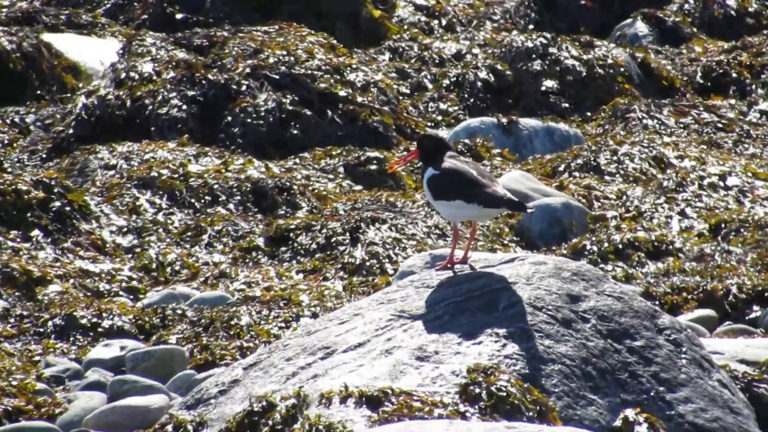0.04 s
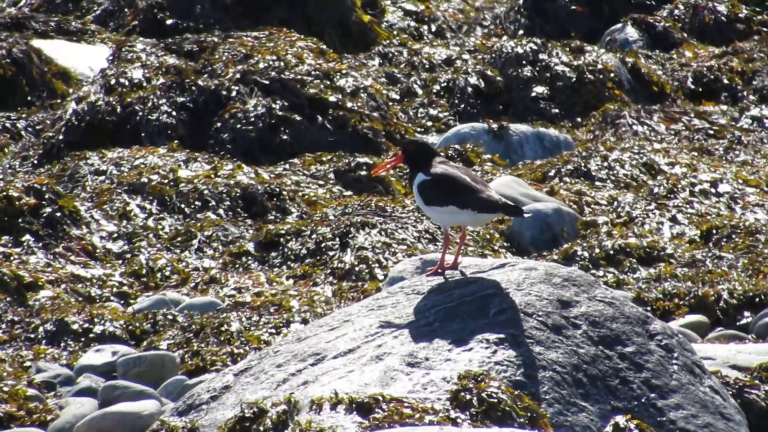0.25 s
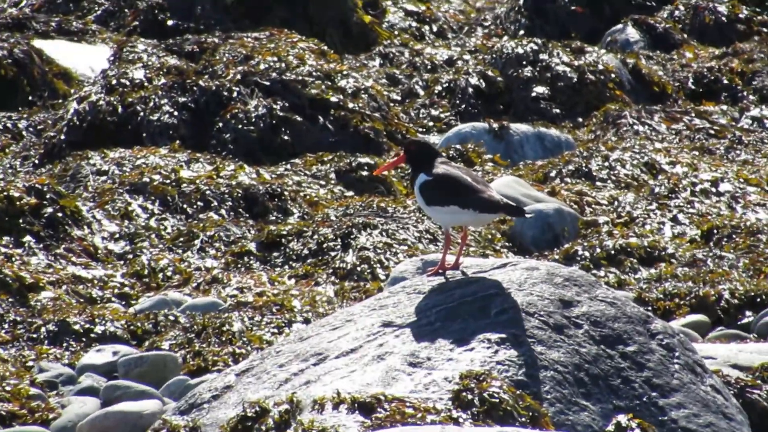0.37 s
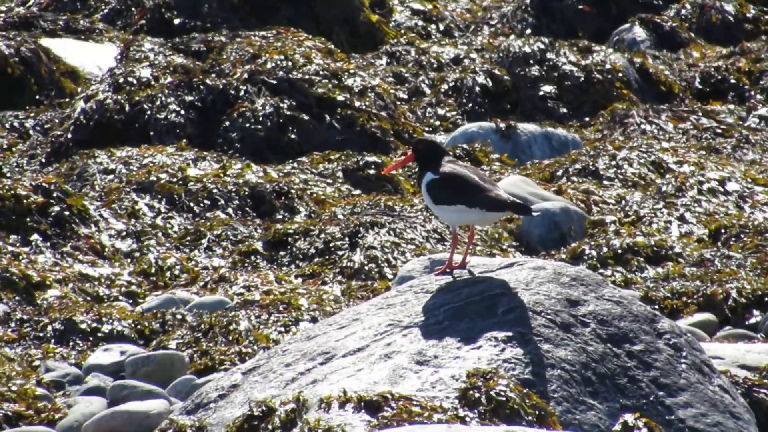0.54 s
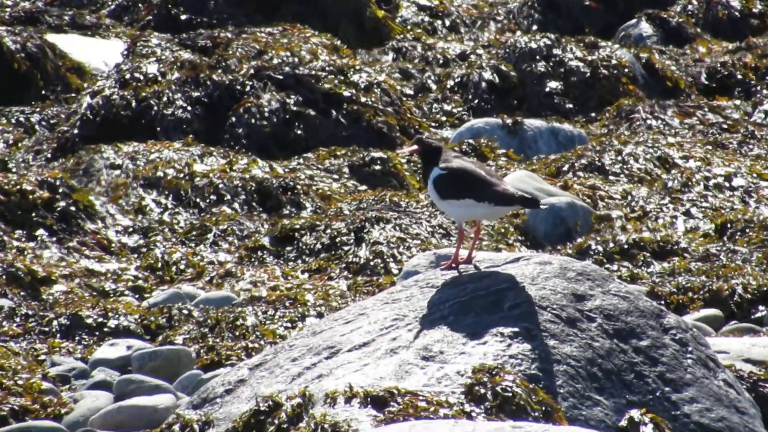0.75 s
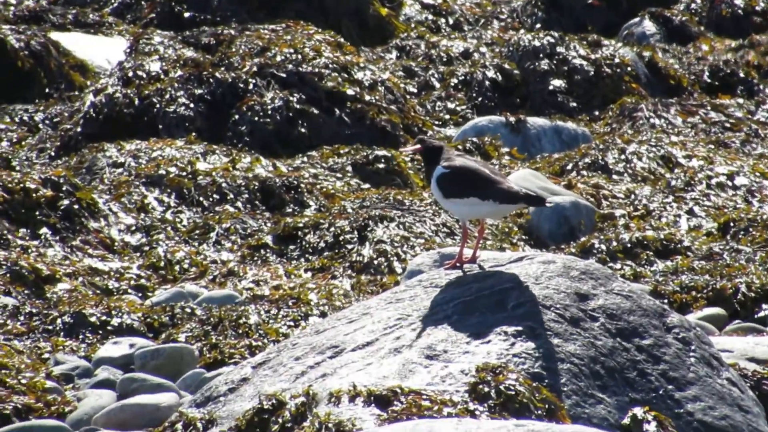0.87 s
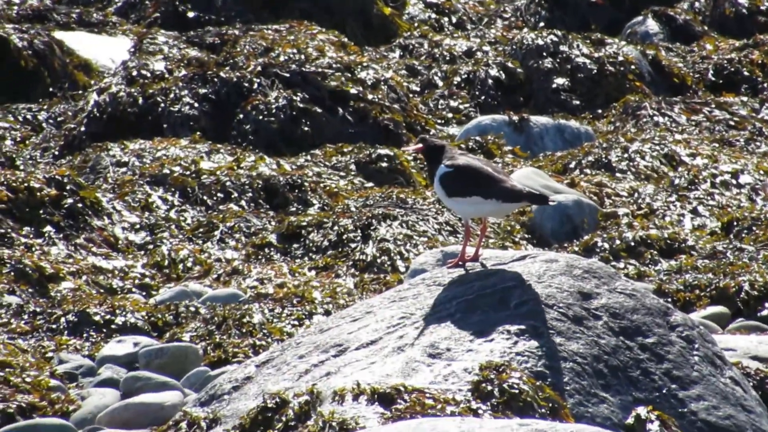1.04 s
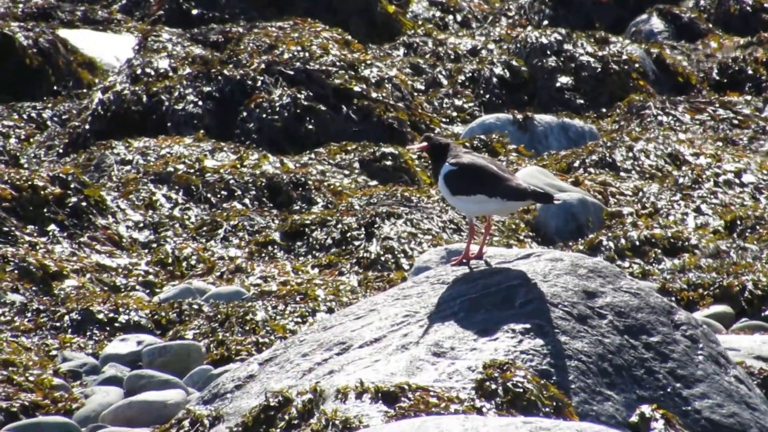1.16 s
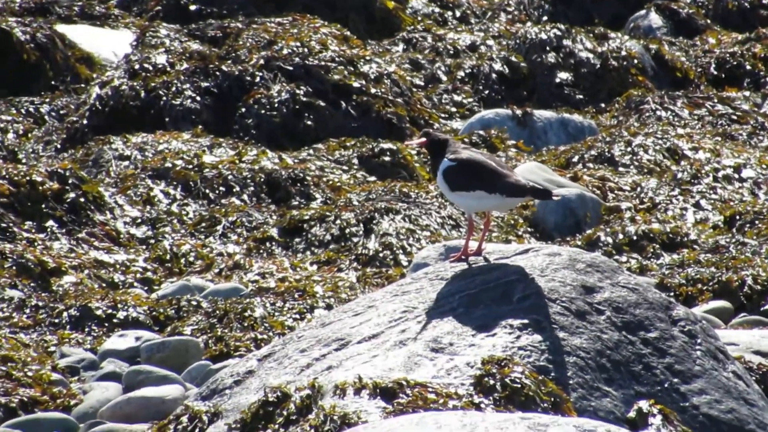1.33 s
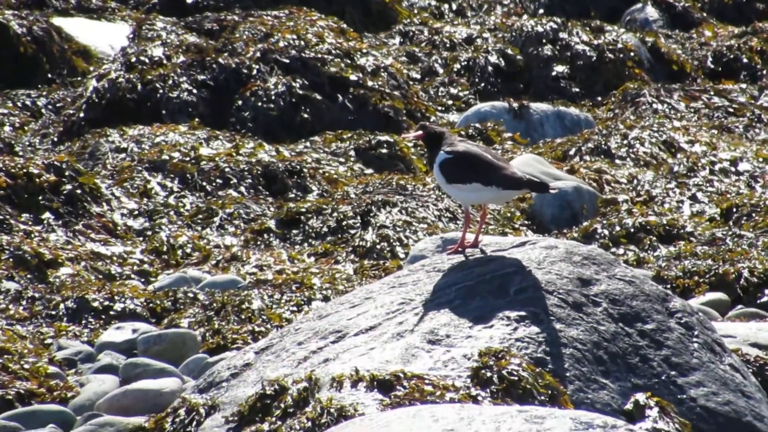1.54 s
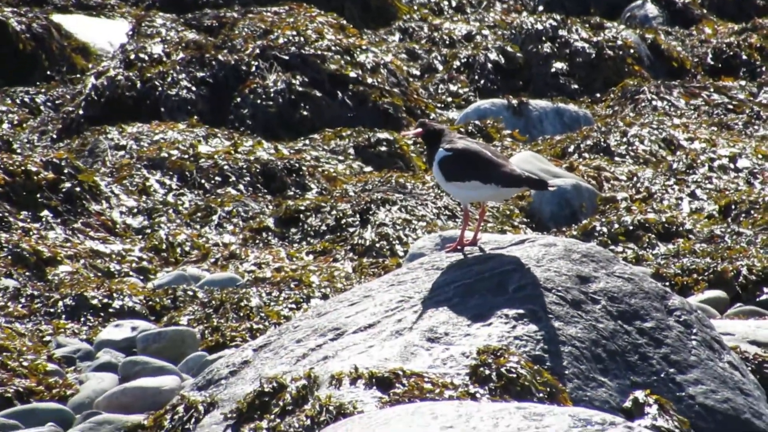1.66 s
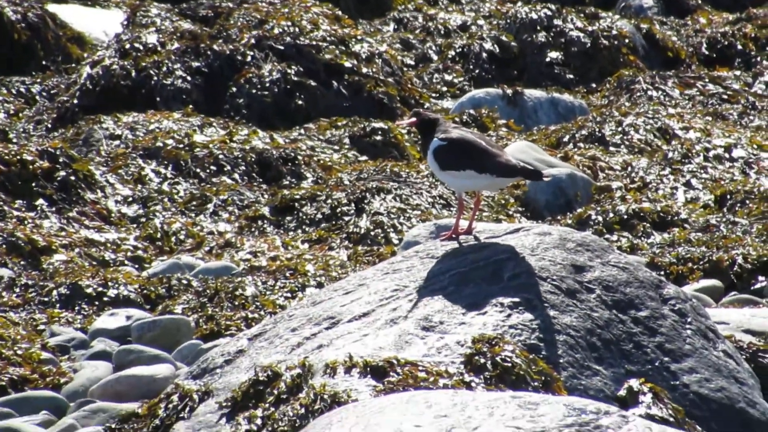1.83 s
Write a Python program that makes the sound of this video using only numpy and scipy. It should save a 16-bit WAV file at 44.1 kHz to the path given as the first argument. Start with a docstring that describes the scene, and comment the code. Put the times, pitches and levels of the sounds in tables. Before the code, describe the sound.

One short, piercing shorebird call cuts through buffeting wind and gently washing water.

```python
"""Wind buffets the microphone, whose housing rings and hums faintly, while small waves wash, fizz
and tick on a rocky shore. An oystercatcher cuts through with one sharp, arching "kleep", a whistle
that brightens with effort, and the stones scatter it back briefly.
Three small plops follow in the water, then one clear plop nearby."""
import sys
import numpy as np
from scipy import signal
from scipy.fft import rfft, irfft
from scipy.io import wavfile
from scipy.ndimage import uniform_filter1d

SR = 44100
rng = np.random.default_rng(int(sys.argv[2]) if len(sys.argv) > 2 else 0)


def dump_mix(stems):
    """Bounce the given channels to the path in sys.argv[1] as a 16-bit WAV at rate SR."""
    frames = np.atleast_2d(stems).T  # one column per channel
    limited = np.clip(frames, -1, 1)  # hard clip at full scale
    pcm = np.round(limited * 32767).astype(np.int16)
    wavfile.write(sys.argv[1], SR, pcm)


N = 83790
T, HZ = np.arange(N) / SR, np.fft.rfftfreq(N, 1 / SR)


def amp(db):
    """Decibels to gain."""
    return 10 ** (np.asarray(db) / 20)


def unit(x):
    """Scales to rms 1."""
    return x / np.sqrt(np.mean(x ** 2) + 1e-20)


def curve(points, col=1):
    """One column of a time table at every sample."""
    rows = np.transpose(points)
    return np.interp(T, rows[0], rows[col])


def eq(points, hz):
    """Reads a spectrum table on a log-frequency axis."""
    f, value = np.transpose(points)
    return np.interp(np.log(hz + 1), np.log(f + 1), value)


def noise(gain):
    """White noise of unit power per Hz, shaped by a gain for each frequency."""
    return irfft(rfft(rng.standard_normal(N)) * gain, N) * np.sqrt(SR / 2)


def low_noise(hz):
    """Noise low-passed at hz, rms 1."""
    return unit(noise(1 / (1 + (HZ / hz) ** 4)))


def ring(hz, width):
    """Noise in one resonance, 6 dB down at hz +/- width."""
    return unit(noise(1 / (1 + ((HZ - hz) / width) ** 2)))


# Rumble spectrum before the gusts (frequency [Hz], density [dB per Hz])
RUMBLE = [(10, -54), (32, -56.5), (58, -51.5), (100, -56.5), (150, -69.5), (200, -71), (270, -75),
          (500, -96), (2000, -125)]
# Gust envelope (time [s], gain [dB])
GUSTS = [(0, 1), (.05, 0.5), (.12, -2.5), (.2, 5.5), (.27, 0.5), (.41, 1), (.5, 4), (.58, -5), (.66, 3),
         (.78, -5), (.87, -5.5), (1.03, -5.5), (1.3, -3.5), (1.58, -3), (1.75, -12.5), (1.9, -3)]
# Single low thumps (time [s], level [dB], pitch [Hz])
BUFFETS = [(0.21, -26, 142), (0.328, -30.5, 86), (0.485, -27.5, 203), (0.497, -24.5, 191),
           (0.801, -27.5, 70), (1.001, -25, 48.7), (1.025, -25.5, 140), (1.444, -25.5, 135)]

def wind():
    """Wind rumbles and thumps on the microphone, pushing the two sides nearly out of phase."""
    strength = amp(curve(GUSTS) - 0.3 * low_noise(4))
    rumble_db = eq(RUMBLE, HZ)
    side, mid = noise(amp(rumble_db)), noise(amp(rumble_db - 15.5))
    out = (np.array([side, -side]) + mid) * strength
    side_turns = np.array([[0], [0.432]])
    for at, db, hz in BUFFETS:
        turns = (T - at) * hz
        envelope = amp(db) * np.exp(-(turns / 0.4) ** 2)
        out += envelope * np.cos(2 * np.pi * (turns + rng.random() + side_turns))
    return out


# Centre of the wash before the swell (frequency [Hz], density [dB per Hz])
WASH_MID = [(30, -74.5), (300, -84.5), (580, -84), (1000, -77.5), (1350, -85.5), (1650, -83), (3300, -90),
            (5000, -90), (6600, -96.5), (8300, -94.5), (10000, -102), (12800, -106), (14000, -113),
            (15000, -126)]
# Its stereo width (frequency [Hz], density [dB per Hz])
WASH_SIDE = [(30, -77), (400, -78.5), (800, -79.5), (1600, -85.5), (2800, -88.5), (4000, -95.5),
             (6500, -96.5), (10000, -100.5), (12800, -105), (14000, -111), (15000, -124)]
# Rise and fall of the waves, for wash and fizz (time [s], gain [dB])
SWELL = [(0, -2.5), (.4, -1.46), (.68, -0.5), (.8, 0), (1.08, 1), (1.22, 0), (1.5, -0.5), (1.7, -1.1),
         (1.9, -1.15)]
# How deeply each band rides the swell (frequency [Hz], depth [dB per dB])
SWELL_DEPTH = [(100, 0.095), (700, 0.83), (2000, 2.03), (6000, 1.1), (14000, 0.54)]

def waves():
    """Small waves make a patchy wash that swells most in the midrange."""
    mid, side = noise(amp(eq(WASH_MID, HZ))), noise(amp(eq(WASH_SIDE, HZ)))
    hz, t, spectrum = signal.stft([mid + side, mid - side], SR, nperseg=512)
    grain = uniform_filter1d(rng.standard_normal(spectrum.shape[1:]), size=9, axis=0)
    patch_db = 1.5 * unit(uniform_filter1d(grain, size=6, axis=1))
    swell_db = eq(SWELL_DEPTH, hz)[:, None] * np.interp(t, *np.transpose(SWELL))
    return signal.istft(spectrum * amp(swell_db + patch_db), SR)[1][:, :N]


def fizz(per_second=340, level_db=-56.5, spread_db=5):
    """Tiny splashes among weed and stones, louder as a wave comes in."""
    out, t = np.zeros((2, N)), T[:600]
    pitches = np.geomspace(1100, 6500, 24)
    for hz in pitches:
        hits = rng.random(N) < per_second / len(pitches) / SR
        gains = amp(spread_db * np.minimum(rng.exponential(1, N), 4))
        age = t * hz / 2.3  # higher splashes die sooner
        ping = age * np.exp(-2 * age) * np.sin(2 * np.pi * hz * t) / np.sqrt(hz)
        left = rng.uniform(0.16, 1.0)
        out += np.array([[left], [1 - left]]) * signal.oaconvolve(hits * gains, ping)[:N]
    return amp(level_db + curve(SWELL)) * unit(out)


# Hollow resonances of the housing (centre [Hz], half width [Hz], level [dB])
HOUSING_MODES = [(746, 49, -53), (822, 25, -57), (925, 79, -62.5)]

def housing(hum_hz=750.2, hum_db=-58, waver_rate_hz=7.06):
    """The microphone's housing rings steadily, with a thin, wavering hum at its lowest resonance."""
    hollow = sum(amp(db) * ring(hz, width) for hz, width, db in HOUSING_MODES)
    pitch = hum_hz + 5.8 * low_noise(waver_rate_hz)
    waver_db = 4 * low_noise(waver_rate_hz)
    hum = unit(amp(waver_db) * np.sin(2 * np.pi * np.cumsum(pitch) / SR))
    return hollow + amp(hum_db) * hum


# Ticks at the water's edge, plus the low body of the near plop at 1.398 s (time [s], half length [s], centre
# [Hz], half width [Hz], level [dB])
LAPS = [(0.032, 0.0021, 5400, 900, -47), (0.172, 0.0025, 5000, 500, -48.5), (0.461, 0.0048, 2150, 300, -48),
        (0.624, 0.0036, 790, 160, -41.5), (0.649, 0.003, 5040, 900, -48.5), (.651, 0.0036, 2280, 400, -49),
        (0.691, 0.0056, 1040, 250, -42.5), (0.851, .007, 1000, 120, -44), (1.043, 0.011, 945, 60, -43),
        (1.08, 0.024, 1630, 200, -50.5), (1.112, 0.022, 755, 102, -43.5), (1.219, 0.0018, 2700, 400, -46.5),
        (1.398, 0.0075, 342, 110, -47.5), (1.719, 0.0064, 2090, 200, -48)]

def laps():
    """Water laps and weed crackles in brief puffs of narrow noise, left of centre; one low puff gives the near
    plop its body."""
    out = np.zeros(N)
    for at, half_length, hz, width, db in LAPS:
        out += amp(db) * ring(hz, width) * np.exp(-((T - at) / half_length) ** 2)
    return out * amp([[1.5], [-1.5]])


# Arch of the "kleep" (time [s], pitch [Hz], effort [dB])
KLEEP = [(.2288, 2715, -7.5), (.241, 2737, -10.5), (.249, 2826, -10.5), (.257, 3046, 0.5), (.269, 3202, 1),
         (.276, 3248, 1.8), (.284, 3050, -1), (.293, 2847, -8), (.297, 2670, -13), (.302, 2584, -6),
         (.306, 2197, -10), (.3115, 1930, -6)]
# Harmonics, lowest first (base level [dB], growth with effort [dB per dB], left minus right [dB],
# attack [s], release [s], lag behind the effort [s])
HARMONICS = [(-22.5, 1.46, 4.5, 0.00032, 0.0012, 0.00019), (-30.5, 0.53, 0.8, 0.0037, 0.0081, 0.0037),
             (-26, 2.4, 4, 0.012, 0.013, 0.0013), (-39, 2.7, 7, 0.0024, 0.033, 0.0017)]
# Tone colour of the throat (frequency [Hz], gain [dB])
THROAT_EQ = [(900, -0.5), (2000, -9.5), (2700, 4), (4500, -4.5), (5400, 2), (5650, 6), (6400, -1),
             (8100, 2), (8400, 6), (8900, 2.5), (9700, -5.5), (10900, 4), (11400, -5), (12400, -4),
             (13000, -4.5)]

def oystercatcher(scoop_depth=0.72, scoop_s=0.0017, flutter_hz=398, rasp_db=-39.5, rasp_s=0.014):
    """A whistle leaps up with a rasp, arches and falls; effort opens the upper harmonics at the top."""
    start, end = KLEEP[0][0], KLEEP[-1][0]
    age = np.maximum(T - start, 0)
    hz = uniform_filter1d(curve(KLEEP), size=150) * (1 + 0.0019 * low_noise(flutter_hz))
    hz *= 1 - scoop_depth * np.exp(-(age / scoop_s) ** 2)
    phase = 2 * np.pi * np.cumsum(hz) / SR
    effort = uniform_filter1d(curve(KLEEP, col=2), size=150)
    out = np.zeros((2, N))
    for k, (db, growth, pan_db, attack, release, lag) in enumerate(HARMONICS, 1):
        gate = (np.clip(age / attack, 0, 1) * np.clip((end - T) / release, 0, 1)) ** 2
        level_db = db + growth * np.interp(T - lag, T, effort) + eq(THROAT_EQ, k * hz)
        out += amp([[pan_db / 2], [-pan_db / 2]]) * gate * amp(level_db) * np.sin(k * phase)
    rasp_envelope = np.clip(age / scoop_s, 0, 1) * np.exp(-(age / rasp_s) ** 2)
    return out + amp(rasp_db) * low_noise(1550) * rasp_envelope


# Early reflections off near rocks (delay [s], left [dB], right [dB])
ROCK_ECHOES = [(.0021, -52, -12.5), (.0075, -35, -23), (0.0243, -30, -21), (0.043, -33, -29)]
# Tone colour of the stones' scatter (frequency [Hz], gain [dB])
SCATTER_EQ = [(2600, 5), (3250, -6.5), (4500, 17), (5500, 5), (6400, -11), (8400, 9), (9700, -1.5),
              (13000, 5)]

def shore(call, t60_s=0.15, predelay_s=0.0038, pre_eq_db=-16):
    """Rocks reflect the call and the stones scatter it into a short, thin tail."""
    t = T[:SR // 2]
    envelope = amp(-60 * t / t60_s) * np.clip(t / predelay_s - 1, 0, 1)
    tail = rng.standard_normal((2, len(t))) * envelope
    tail *= amp(pre_eq_db) / np.linalg.norm(tail[0])
    colour = amp(eq(SCATTER_EQ, np.fft.rfftfreq(len(t), 1 / SR)))
    tail = irfft(rfft(tail) * colour, len(t))
    for delay, left_db, right_db in ROCK_ECHOES:
        tail[:, round(delay * SR)] += amp([left_db, right_db])
    return signal.fftconvolve(call, tail, axes=1)[:, :N]


# Plops in the water (time [s], gain [dB], start pitch [Hz], end pitch [Hz], decay [s])
PLOPS = [(.888, -34, 2900, 1370, 0.002), (.978, -35.5, 2880, 1590, 0.0019),
         (1.009, -36.5, 3070, 2270, 0.0032), (1.3902, -30.5, 1860, 404, 0.0058)]

def plops(attack_s=0.0008, splash_s=0.0032):
    """Short falling blips, each with a splashy snap as it breaks the surface."""
    out = np.zeros(N)
    for at, db, from_hz, to_hz, decay in PLOPS:
        t = np.maximum(T - at, 0)
        hz = to_hz + (from_hz - to_hz) * np.exp(-t / (0.45 * decay))
        blip = np.sin(2 * np.pi * np.cumsum(hz * (t > 0)) / SR)
        splash = ring(hz=1670, width=610) * np.exp(-t / splash_s)
        envelope = (1 - np.exp(-t / attack_s)) * np.exp(-t / decay)
        out += amp(db) * envelope * (blip + splash)
    return out * amp([[1.2], [-1.2]])


# Stereo tilt of water and housing (frequency [Hz], left minus right [dB])
BED_PAN = [(100, -3.5), (500, -0.1), (900, 0.5), (1600, 2.5), (3000, 3), (5000, 0.6), (9000, -0.2),
           (14000, 1)]

def pan_bed(bed, left_lead_s=0.00004):
    """The bed arrives first on the left; its upper mids lean left and its lows right."""
    pan_db = eq(BED_PAN, HZ) / 2
    lead = np.exp(2j * np.pi * HZ * left_lead_s)
    return irfft(rfft(bed) * np.array([amp(pan_db) * lead, amp(-pan_db)]), N)


def scene():
    """Wind over a bed of water and housing ring, with one call and its echo."""
    call = oystercatcher()
    echo = shore(call)
    bed = waves() + fizz() + housing() + laps() + plops()
    return wind() + pan_bed(bed) + call + echo


# Narrow cuts in the treble (centre [Hz], width [Hz])
NOTCHES = [(3930, 340), (7885, 63)]

def record(dry, cutoff_hz=15000):
    """Two notch filters and a steep low-pass shape the whole mix."""
    for hz, width in NOTCHES:
        dry = signal.lfilter(*signal.iirnotch(hz, hz / width, SR), dry)
    low_pass = signal.firwin(511, cutoff_hz, window=("kaiser", 9), fs=SR)
    return signal.oaconvolve(dry, low_pass[None], "same")


dry = scene()
out = record(dry)
dump_mix(out)
```